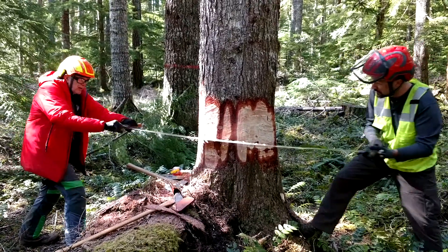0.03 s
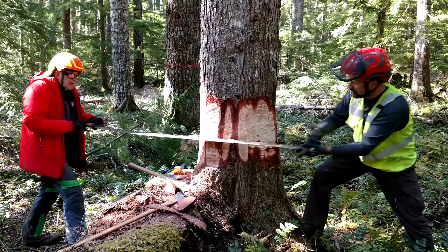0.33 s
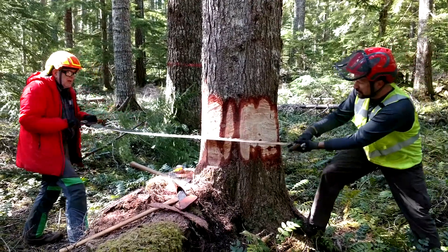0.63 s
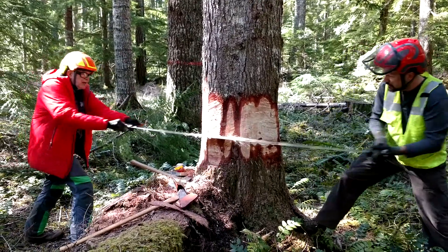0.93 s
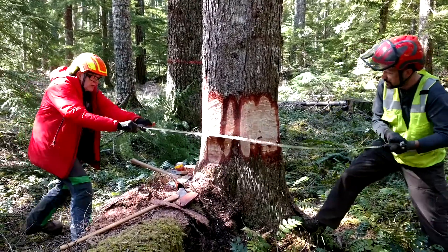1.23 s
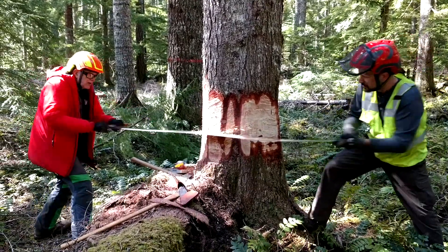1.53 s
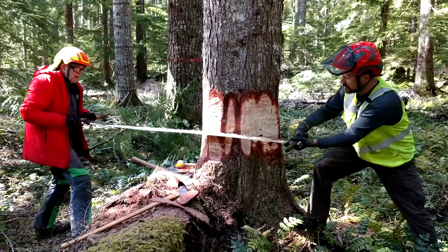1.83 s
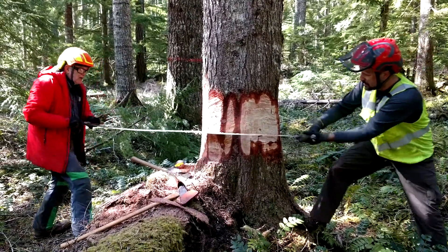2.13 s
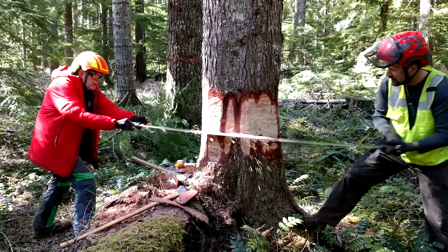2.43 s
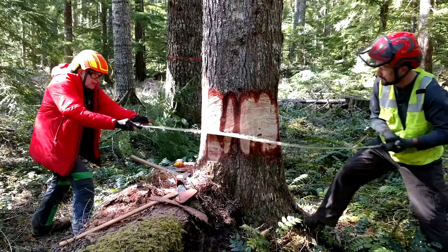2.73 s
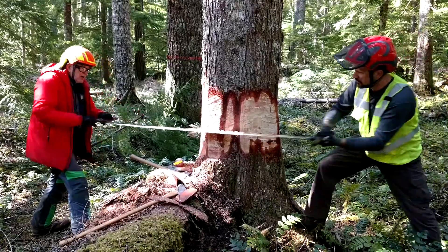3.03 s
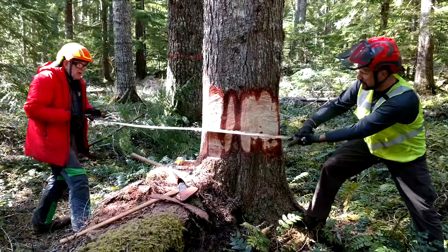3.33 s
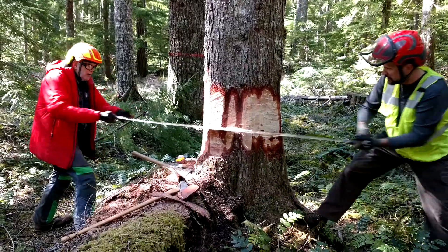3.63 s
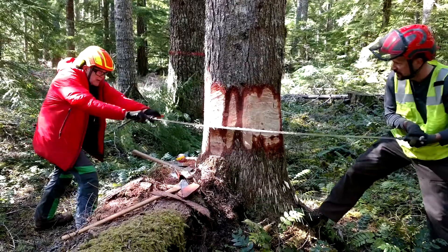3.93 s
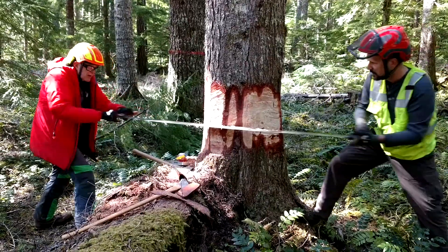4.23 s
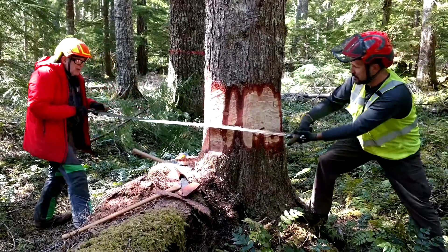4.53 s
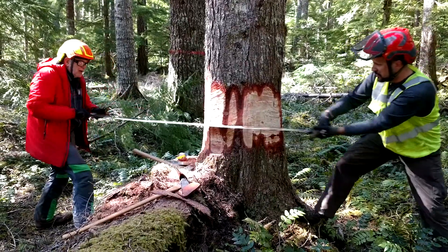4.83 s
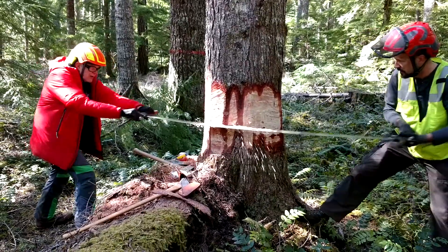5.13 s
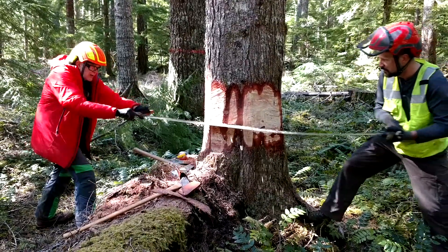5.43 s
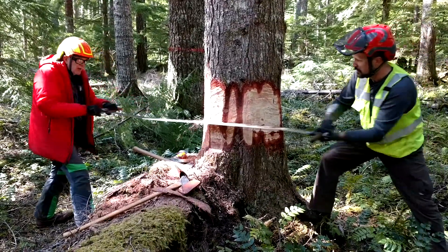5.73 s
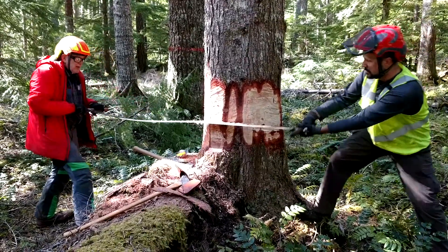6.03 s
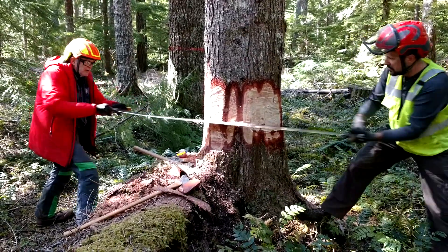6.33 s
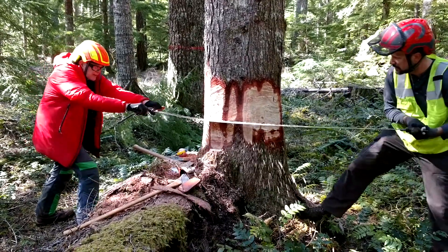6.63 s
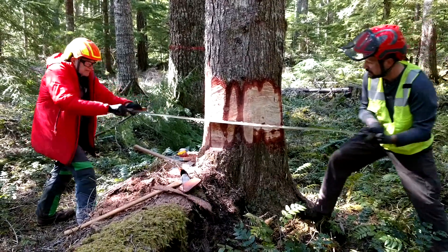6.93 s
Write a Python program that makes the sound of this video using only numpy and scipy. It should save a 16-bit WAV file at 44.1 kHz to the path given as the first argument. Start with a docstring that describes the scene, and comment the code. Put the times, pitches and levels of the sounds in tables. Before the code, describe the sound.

A long crosscut saw rasps back and forth through a tree trunk, its blade ringing, with a few dull thumps in a quiet forest.

```python
"""In a quiet forest, two people pull a long crosscut saw to and fro through a standing trunk.
The teeth tear fibres with a bright rasp and catch now and then; the kerf drones under them.
The cutting sets the steel blade ringing, with a sharp zing into each turn on the right.
A few dull thumps and soft low bumps land close by.
A short diffuse smear on the right channel widens the stereo sound."""
import sys
import numpy as np
from scipy import signal
from scipy.fft import rfft, irfft, next_fast_len
from scipy.io import wavfile
from scipy.ndimage import map_coordinates

SR = 44100
rng = np.random.default_rng(int(sys.argv[2]) if len(sys.argv) > 2 else 0)


def bounce(signal):
    """Save signal as a 16-bit WAV file at the path given by the first command-line argument."""
    frames = np.transpose(np.atleast_2d(signal))
    limited = np.clip(frames, -1, 1)
    pcm = np.round(limited * 32767).astype(np.int16)
    wavfile.write(sys.argv[1], SR, pcm)


N = 307377
T = np.arange(N) / SR


def amp(db):
    """Decibels to gain."""
    return 10 ** (np.asarray(db) / 20)


def unit(x):
    """Scale to rms 1."""
    return x / np.sqrt(np.mean(x ** 2) + 1e-20)


def colour(x, points):
    """Filter by a curve of (freq_hz, gain_db) points."""
    size = next_fast_len(N + 4096)
    hz, db = np.transpose(points)
    gain = amp(np.interp(np.log(np.fft.rfftfreq(size, 1 / SR) + 1), np.log(hz), db))
    return irfft(rfft(x, size) * gain, size)[..., :N]


def noise(points):
    """Noise of rms 1, shaped by (freq_hz, gain_db) points."""
    return unit(colour(rng.standard_normal(N), points))


def wander(knots_per_s):
    """Smooth random curve, rms 1."""
    knots = rng.standard_normal(8192)
    return unit(map_coordinates(knots, [T * knots_per_s], order=2, mode="wrap"))


def swell(centre_s, half_width_s):
    """Gaussian envelope, peak 1."""
    return np.exp(-((T - centre_s) / half_width_s) ** 2)


def resonate(x, hz, width_hz):
    """Unity-gain resonance that follows a pitch curve."""
    carrier = np.exp(2j * np.pi * np.cumsum(hz * np.ones(N)) / SR)
    pole = np.exp(-np.pi * width_hz / SR)
    return 2 * (carrier * signal.lfilter([1 - pole], [1, -pole], x / carrier)).real


def linger(gain, time_s):
    """Envelope of a body that stores energy and releases it over time_s."""
    pole = np.exp(-1 / (time_s * SR))
    return np.sqrt(signal.lfilter([1 - pole], [1, -pole], gain ** 2))


def tail(x, t60_s, shifts_per_s=11):
    """Diffuse decay of unit energy; its paths keep shifting as the blade moves."""
    paths = rng.standard_normal((4, SR)) * amp(-60 * T[:SR] / t60_s)
    shares = np.array([wander(shifts_per_s) for _ in paths])
    shares /= np.linalg.norm(shares, axis=0)
    return sum(signal.fftconvolve(x * share, path / np.linalg.norm(path))[:N]
               for share, path in zip(shares, paths))


# Forest background spectrum: freq_hz, gain_db
FOREST_SPECTRUM = [(20, -22), (65, 0.5), (250, 3), (600, -13.5), (1500, -10.5), (4000, -34), (10000, -14),
                   (16000, -55)]


def forest(level_db):
    """Steady low hush."""
    return amp(level_db) * noise(FOREST_SPECTRUM)


# Diffuse-to-direct ratio on the right channel: freq_hz, ratio_db
SMEAR_RATIO = [(100, -12.5), (300, 5.5), (700, -58), (1500, 2), (2200, -7), (2900, -5.5), (4400, -40.5),
               (7000, 1.5), (9000, 15), (11000, 6)]


def stereo_smear(x, t60_s=0.06):
    """Trades part of the direct power for a short diffuse smear; on one channel it widens the sound."""
    direct_share = [(hz, -10 * np.log10(1 + amp(db) ** 2)) for hz, db in SMEAR_RATIO]
    return colour(x + colour(tail(x, t60_s), SMEAR_RATIO), direct_share)


# Low bumps: centre_s, level_db, half_width_s
BUMPS = [(1.06, -49, 0.062), (1.569, -40, 0.03), (1.7, -38.5, 0.05), (1.87, -41, .018), (2.86, -42, 0.0087),
         (3.05, -54, 0.026), (4.4, -56, .08), (5.17, -43, 0.014), (5.57, -45, .023), (5.75, -45, 0.018),
         (6.33, -45, 0.028), (6.57, -39.5, 0.066), (6.782, -42, 0.033)]


def bumps():
    """Short soft swells of low rumble."""
    envelope = sum(amp(db) * swell(centre_s, half_width_s) for centre_s, db, half_width_s in BUMPS)
    return envelope * noise([(25, -13), (70, 19.5), (150, 9.5), (300, -24), (900, -35), (4000, -80)])


# Close thumps: start_s, level_db, first_hz, last_hz, glide_s, length_s, crack_db
THUMPS = [(1.774, -15.5, 801, 120.7, 0.0018, 0.014, -31), (3.5713, -19.5, 257, 640, 0.011, 0.0087, -21.5),
          (6.6843, -19, 980, 85.2, 0.0025, 0.031, -33), (6.7078, -19.5, 884, 65.9, 0.0027, 0.028, -52)]


def thumps(rise_s=0.00073, crack_s=0.0035):
    """Dull knocks: a brief crack and a tone that slides quickly to its last pitch."""
    out, t = np.zeros(N), T[:SR // 5]
    crack = noise([(50, -16), (200, -5), (600, 12), (1300, -11), (3000, -8), (6000, -25), (12000, -32)])
    for start_s, level_db, first_hz, last_hz, glide_s, length_s, crack_db in THUMPS:
        hz = last_hz + (first_hz - last_hz) * np.exp(-t / glide_s)
        envelope = amp(level_db) * (1 - np.exp(-t / rise_s)) * np.exp(-(t / length_s) ** 2)
        knock = envelope * np.sin(2 * np.pi * np.cumsum(hz) / SR)
        span = slice(round(start_s * SR), round(start_s * SR) + len(t))
        out[span] += knock + amp(crack_db) * np.exp(-t / crack_s) * crack[span]
    return out


# Lone blade notes: centre_s, pitch_hz, level_db, half_width_s
BLADE_NOTES = [(.44, 10440, -69, 0.018), (.55, 9560, -50, 0.038), (1.17, 9680, -50, 0.064),
               (1.2, 800, -57.5, 0.093), (1.49, 800, -45, 0.032), (2.43, 805, -40, 0.021),
               (2.62, 9400, -48, .05), (3.29, 10430, -67, .058), (3.72, 820, -42, .025),
               (3.951, 1325, -54.5, 0.26), (3.95, 816, -54, 0.11), (5.2, 805, -46, 0.045),
               (5.11, 796, -34, 0.019), (5.56, 795, -43.5, 0.033), (6.93, 3660, -44.5, 0.065)]


def blade_notes(flex=0.00216):
    """Single blade notes sing briefly at listed moments, mid-stroke or near the turns."""
    bent_time_s = np.cumsum(1 + flex * wander(40)) / SR
    return sum(amp(db) * swell(centre_s, half_width_s) * np.sin(2 * np.pi * hz * bent_time_s)
               for centre_s, hz, db, half_width_s in BLADE_NOTES)


def steel_modes(drive, modes, flex, grip_db):
    """Modes waver as the blade flexes; each comes and goes as the kerf grips a new spot."""
    out = np.zeros(N)
    for hz, db, t60_s in modes:
        gripped = drive * amp(grip_db * wander(3.5))
        flexed_hz = hz * (1 + flex * wander(5))
        out += amp(db) * unit(resonate(gripped, flexed_hz, width_hz=2.2 / t60_s))
    return out


# Blade modes, lowest pair and upper set: pitch_hz, relative_db, t60_s
LOW_MODES = [(794.3, -2.5, 0.24), (841, -4, 0.095)]
HIGH_MODES = [(1055, -16, 0.95), (1221, -11, 0.08), (1352, -12, 0.3), (1730, -24, 0.54), (1870, -14, 0.09),
              (3680, -19, 0.25), (3640, -13, 0.22), (3800, -33, .2), (7800, -19, 0.13), (9000, -3, 0.055),
              (11100, -13, 0.11)]


def blade_ring(tearing, rasp, ring_gain, kerf_gain, diffuse_db=-16, high_db=-52.5):
    """The teeth ring the steel: a lingering low pair, a diffuse shimmer and faint upper modes."""
    low = unit(steel_modes(tearing, LOW_MODES, flex=0.0062, grip_db=2.5))
    diffuse = tail(rasp, t60_s=0.12)
    high = steel_modes(tearing * kerf_gain, HIGH_MODES, flex=0.0036, grip_db=4)
    return linger(ring_gain, time_s=0.061) * low + amp(diffuse_db) * diffuse + amp(high_db) * high


# Zing strength at each right-hand turn: time_s, gain_db
ZING_GAINS = [(0, 3), (1.26, -1.5), (2.66, 3.5), (4.0, 4.5), (5.33, 1.5), (6.7, -4)]


def blade_zing(rasp, position, low_hz=6950, stretch=0.138, stage_width_hz=520, flicker_db=3):
    """A sharp resonance sinks as the blade runs out to the right and climbs as it returns."""
    hz = low_hz * np.exp(stretch * (1 - position) ** 2)
    gain = amp(np.interp(T, *np.transpose(ZING_GAINS)) + flicker_db * wander(30))
    reach = np.clip(position + 0.79, 0, 1)
    return gain * reach * resonate(resonate(rasp, hz, stage_width_hz), hz, stage_width_hz)


def teeth(speed, teeth_per_s=170, bite_s=0.006, bite=0.062, snaps_per_s=16000, rub=0.91):
    """Teeth bite unevenly and snap tiny fibres; the blade's flanks rub. Rates are for full speed."""
    pace = 0.25 + 0.75 * speed
    tooth_rate = teeth_per_s * pace * np.exp(0.35 * wander(120))
    tooth_count = np.floor(np.cumsum(tooth_rate) / SR)
    bites = np.diff(tooth_count, prepend=0) * np.minimum(rng.exponential(1, N), 3)
    force = 1 + bite * signal.lfilter([1], [1, -np.exp(-1 / (bite_s * SR))], bites)
    snaps = rng.standard_normal(N) * (rng.random(N) < snaps_per_s * pace / SR) / np.sqrt(pace)
    return unit(force * (unit(snaps) + rub * rng.standard_normal(N)))


def trunk_shake(drone_gain, snag, snag_db=-23, idle_db=-58, uneven_db=-0.6):
    """Envelope of the drone: pull and snags shake the trunk, which sounds on briefly."""
    load = np.hypot(drone_gain, amp(snag_db) * snag)
    return np.hypot(linger(load, time_s=0.031), amp(idle_db)) * amp(uneven_db * wander(11))


# Kerf drone spectrum: freq_hz, gain_db
DRONE_SPECTRUM = [(30, -26), (75, -17), (120, 7), (170, 6), (350, -0.5), (440, -2.5), (560, 8.5),
                  (750, 8.5), (1000, -1), (1700, 1), (2200, -11.5), (4000, 0.5), (9000, -4.5)]


def kerf_drone(speed):
    """Coarse tooth bites sound the wood around the cut."""
    bites = teeth(speed, teeth_per_s=130, bite_s=0.0029, bite=0.64, snaps_per_s=4500, rub=0.57)
    return unit(colour(bites, DRONE_SPECTRUM))


def wood_grain(x, patch_db=1.5, glint_db=2.5, frame=512, hop=128):
    """Changing wood makes the rasp flicker in broad patches; briefly freed blade modes add glints."""
    spectrum = signal.stft(x, nperseg=frame, noverlap=frame - hop)[2]
    row, col = np.indices(spectrum.shape)

    def islands(width_hz, length_s):
        """Smooth random field over frequency and time, rms 1."""
        grid = [row * SR / frame / width_hz, col * hop / SR / length_s]
        return unit(map_coordinates(rng.standard_normal((256, 512)), grid, order=2, mode="wrap"))

    gain = amp(patch_db * islands(900, 0.025) + glint_db * islands(130, 0.04))
    return unit(signal.istft(spectrum * gain, nperseg=frame, noverlap=frame - hop)[1][:N])


# Tooth rasp spectrum: freq_hz, gain_db
RASP_SPECTRUM = [(1200, -17.5), (2100, -23.5), (3100, -11), (4300, -7), (5300, -8.5), (6200, -4),
                 (7000, -0.5), (8500, -3), (10500, -3), (12800, -12.5), (15800, -20.5)]


def tooth_rasp(tearing):
    """Bright rasp of tearing fibres."""
    return unit(colour(tearing, RASP_SPECTRUM))


# Teeth catching in the kerf: start_s, level_db, rise_s, decay_s
CATCHES = [(0.0, -30, 0.017, 0.08), (0.142, -29, .001, 0.047), (.668, -33, 0.0023, 0.081),
           (.799, -24, 0.048, 0.072), (1.003, -28, 0.017, 0.033), (1.232, -40.3, .032, 0.012),
           (1.329, -42, .004, 0.069), (1.397, -30, 0.0093, 0.073), (1.457, -26, 0.015, .017),
           (1.814, -29.5, 0.032, 0.027), (1.982, -40.5, 0.06, .05), (2.048, -30.5, 0.026, 0.015),
           (2.146, -30.5, 0.057, .01), (2.271, -24, 0.024, 0.066), (2.335, -23.5, 0.0049, 0.0055),
           (2.411, -27, .002, 0.0056), (2.786, -29, 0.07, .013), (2.945, -25.5, 0.0066, 0.016),
           (3.392, -34.5, 0.013, 0.02), (3.437, -31.5, 0.033, 0.014), (3.57, -17.5, .001, 0.0029),
           (4.133, -27, .012, .093), (4.694, -49, .004, .12), (5.547, -29, 0.0029, .027),
           (6.055, -46.5, .028, .033), (6.175, -31, .017, .005)]


def catches():
    """Extra force of snagged teeth: linear rise, exponential fall."""
    force = np.zeros(N)
    for start_s, level_db, rise_s, decay_s in CATCHES:
        age_s = np.maximum(T - start_s, 0)
        fall = np.exp(-np.maximum(age_s - rise_s, 0) / decay_s)
        force += amp(level_db) * np.minimum(age_s / rise_s, 1) * fall
    return force


# Strokes, leftward first, then alternating:
# start_s, hardest_s, stop_s, rasp_db, rasp_slack_db, drone_db, ring_db
STROKES = [(0.06, 0.37, 0.585, -24.8, 14, -44, -54), (0.618, 1.089, 1.187, -27, 15.5, -47.5, -52.5),
           (1.447, 1.598, 1.96, -24.3, 13.5, -44, -53), (2.113, 2.436, 2.65, -25.5, 8.5, -43, -47),
           (2.67, 3.098, 3.325, -26.5, 9, -45, -50.5), (3.416, 3.707, 3.976, -23.3, 10, -46, -46.5),
           (3.996, 4.364, 4.667, -25.5, 10, -45, -54.5), (4.766, 5.04, 5.31, -23.5, 9, -42, -47),
           (5.341, 5.735, 6.003, -27.5, 5.5, -45, -53), (6.128, 6.419, 6.68, -24, 10, -40.5, -49),
           (6.726, 6.968, 7.33, -27, 11, -45.5, -45)]


def swing():
    """Pendulum motion with rests between strokes: position (-1 left, +1 right) and speed (0 to 1)."""
    strokes_done = sum(np.clip((T - start) / (stop - start), 0, 1) for start, _, stop, *_ in STROKES)
    return np.cos(np.pi * strokes_done), abs(np.sin(np.pi * strokes_done))


def effort(speed, full_bite_speed=0.38, drone_slack_db=5, drone_exponent=0.46, ring_exponent=2.9):
    """Rasp, drone and low-ring gains follow speed; rasp and drone also swell to the hardest pull."""
    rasp, drone, ring = np.zeros((3, N))
    for start_s, hardest_s, stop_s, rasp_db, rasp_slack_db, drone_db, ring_db in STROKES:
        moving = speed * ((T >= start_s) & (T < stop_s))
        slack = np.interp(T, [start_s, hardest_s, stop_s], [1, 0, 1])
        rasp += amp(rasp_db - rasp_slack_db * slack) * np.tanh(moving / full_bite_speed)
        drone += amp(drone_db - drone_slack_db * slack) * moving ** drone_exponent
        ring += amp(ring_db) * moving ** ring_exponent
    return rasp, drone, ring


def saw(rasp_trim_db=-0.51, drone_trim_db=1, growth_rings_db=0.05, idle_rub_db=-57):
    """Strokes and snags drive the rasping teeth, the droning kerf and the ringing blade."""
    position, speed = swing()
    rasp_gain, drone_gain, ring_gain = effort(speed)
    snag = catches()
    pull = rasp_gain * amp(rasp_trim_db + growth_rings_db * wander(22))
    cut_gain = np.hypot(np.hypot(pull, snag), amp(idle_rub_db))  # still rubs while turning round
    kerf_gain = trunk_shake(amp(drone_trim_db) * drone_gain, snag)
    tearing = wood_grain(teeth(speed))
    rasp = cut_gain * tooth_rasp(tearing)
    drone = kerf_gain * kerf_drone(speed)
    zing = blade_zing(cut_gain * tooth_rasp(teeth(speed)), position)
    ring = blade_ring(tearing, rasp, ring_gain, kerf_gain)
    return rasp + drone + zing + ring + blade_notes()


def scene(reverb_db=-17, reverb_t60_s=0.14):
    """Saw, thumps and forest at two ports, left and right; each gets its own short reverb of the saw."""
    sawing = saw()
    sawing_right = stereo_smear(sawing)
    shared = thumps() + bumps() + forest(level_db=-56)
    ports = []
    for heard in (sawing, sawing_right):
        air = forest(level_db=-65)
        reverb = amp(reverb_db) * tail(sawing, reverb_t60_s)
        ports.append(heard + shared + reverb + air)
    return np.array(ports)


# Right microphone port, relative to the left: freq_hz, gain_db
RIGHT_RESPONSE = [(70, 1.5), (170, -5), (300, -4), (750, -4.5), (1050, -0.5), (2200, 3.5), (4300, -3),
                  (5500, -3), (7000, -6.5), (8500, -17.5), (10000, -27.5), (15000, -29)]


def record(dry, delay_samples=20, cutoff_hz=15850):
    """The right port hears later, duller and inverted; both channels are low-passed."""
    delayed = np.pad(dry[1], (delay_samples, 0))[:N]
    right = -colour(delayed, RIGHT_RESPONSE)
    lowpass = signal.firwin(511, cutoff_hz, window=("kaiser", 9), fs=SR)
    return signal.oaconvolve(np.array([dry[0], right]), lowpass[None], "same", axes=1)


dry = scene()
out = record(dry)
bounce(out)
```